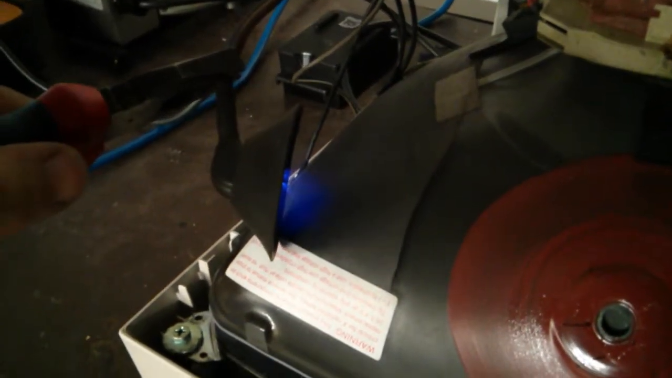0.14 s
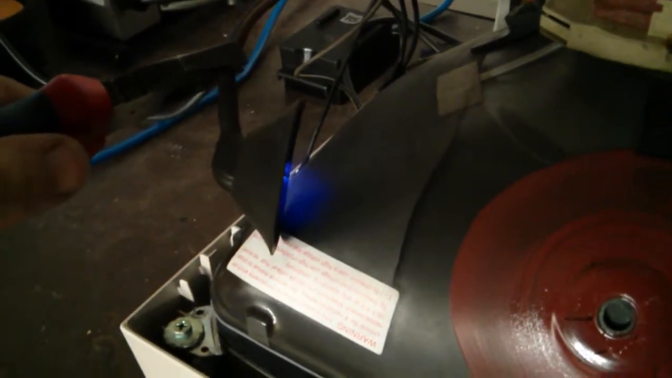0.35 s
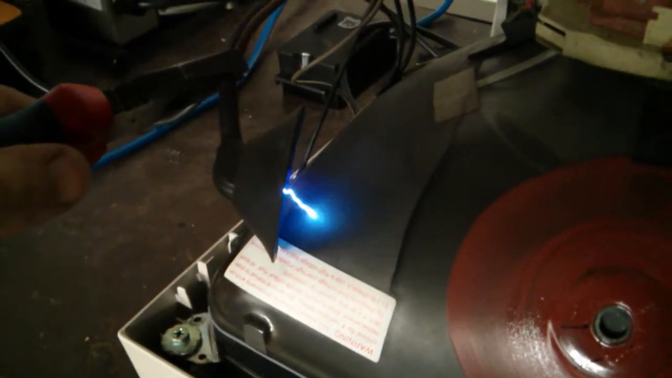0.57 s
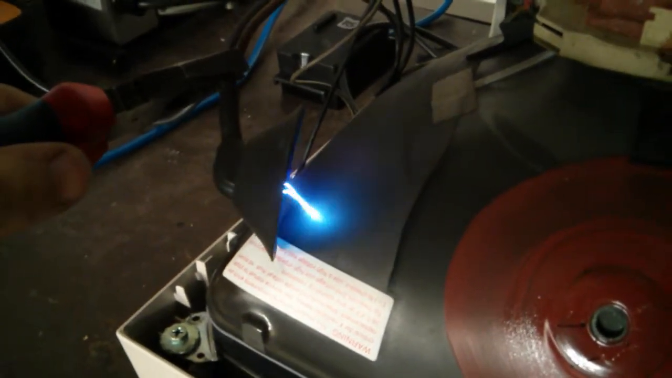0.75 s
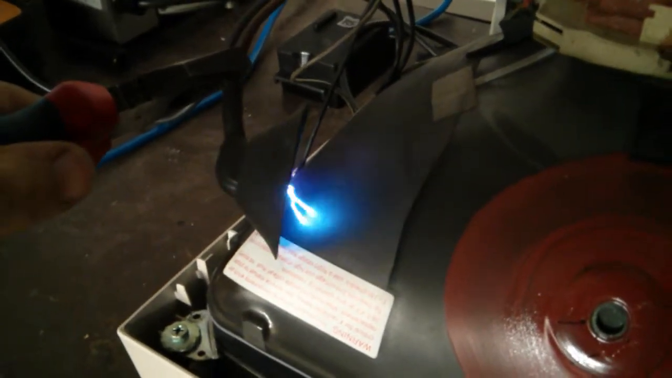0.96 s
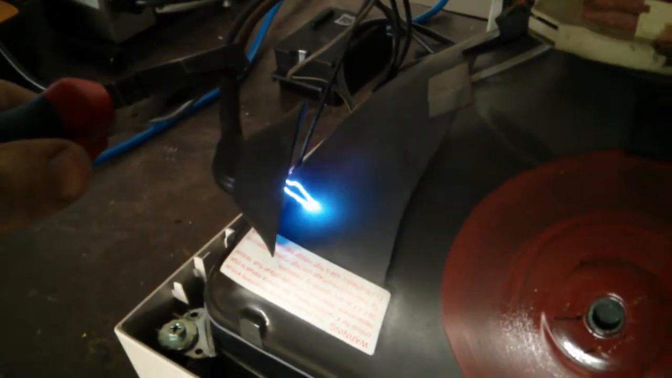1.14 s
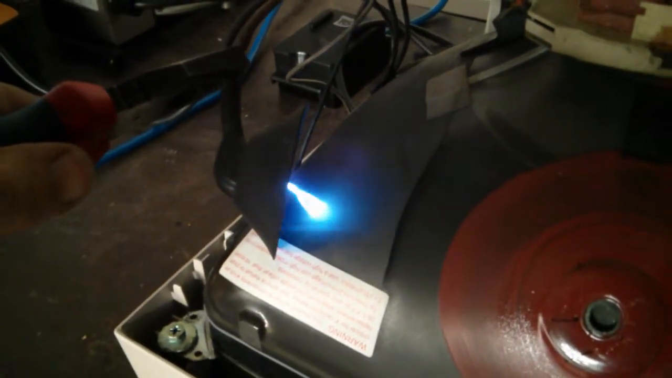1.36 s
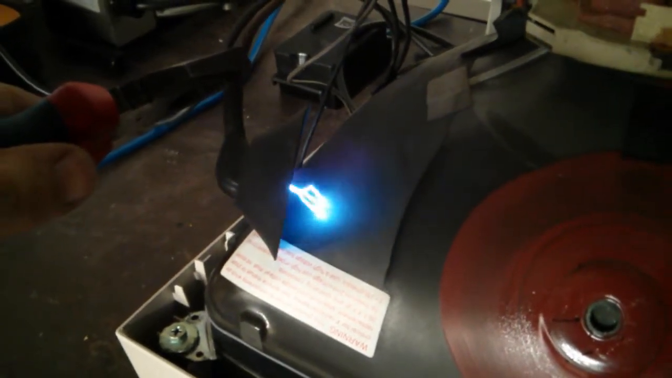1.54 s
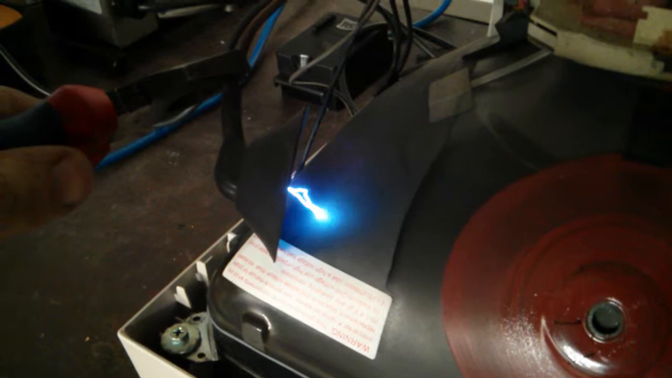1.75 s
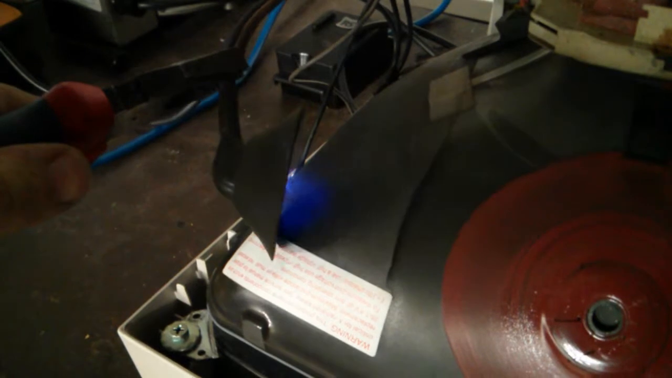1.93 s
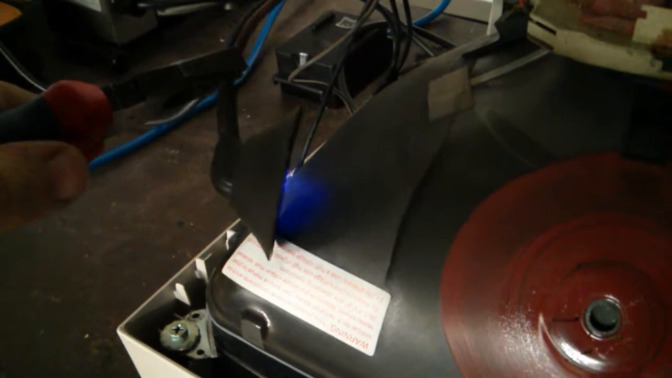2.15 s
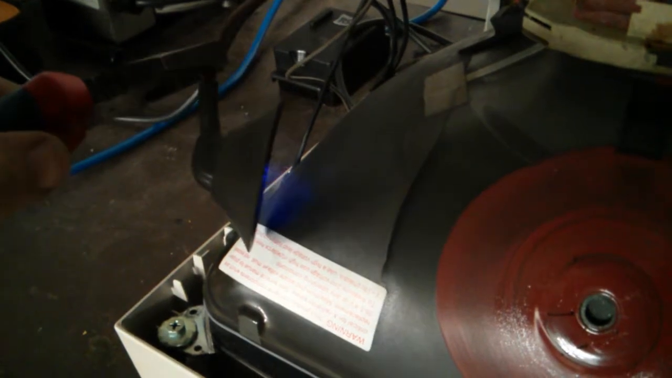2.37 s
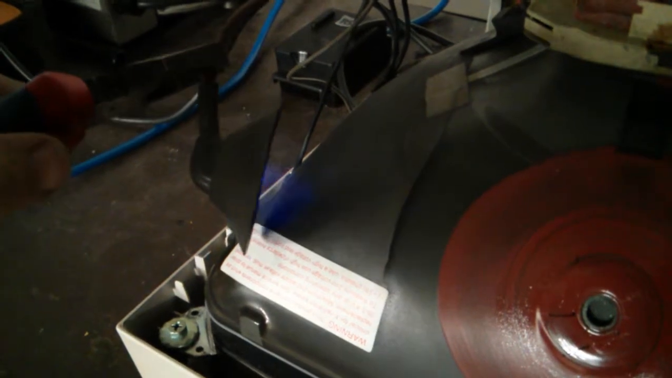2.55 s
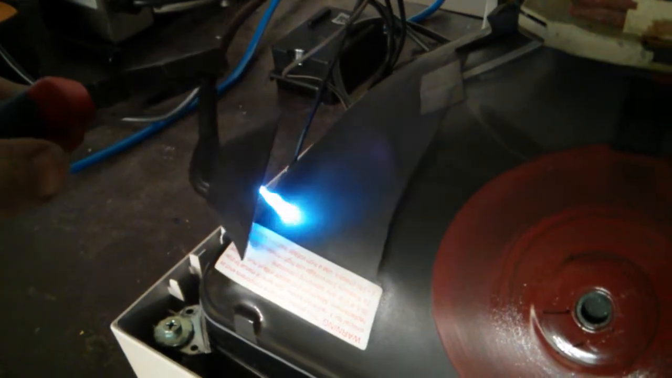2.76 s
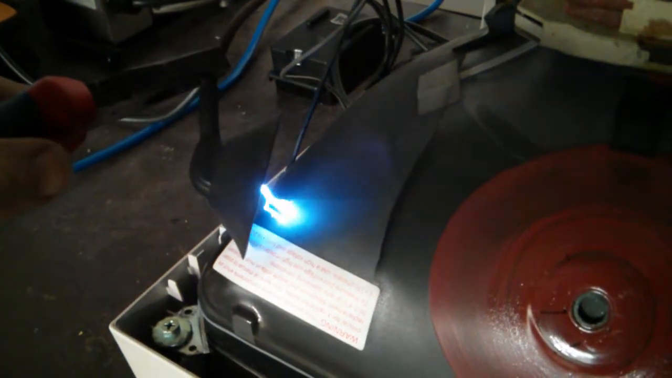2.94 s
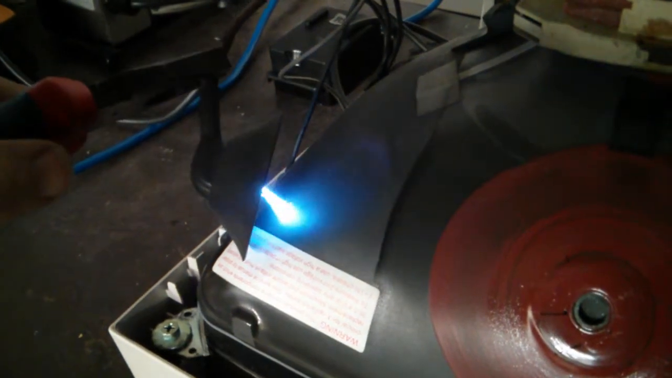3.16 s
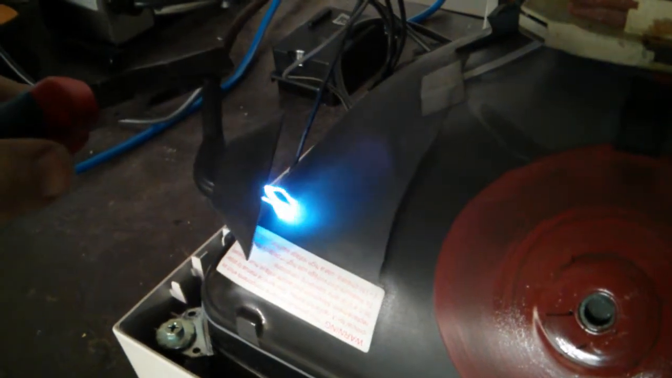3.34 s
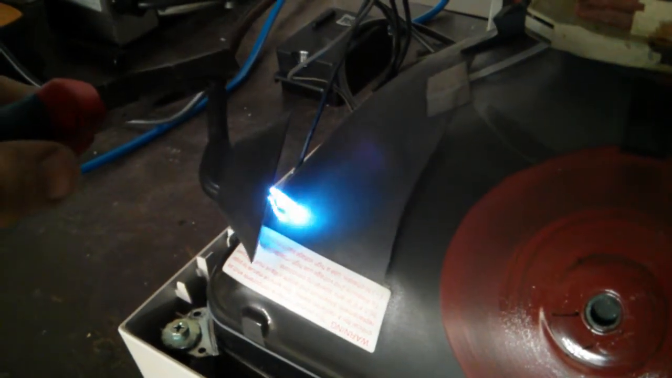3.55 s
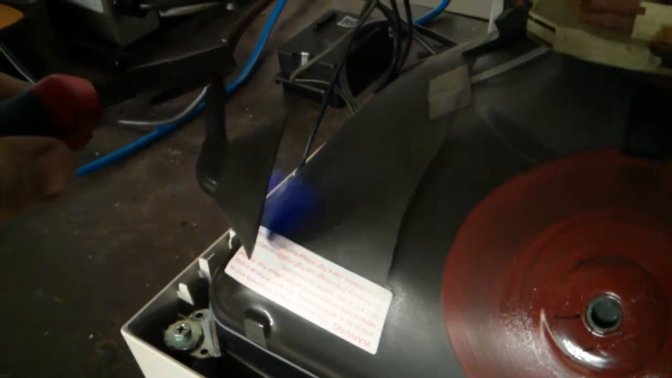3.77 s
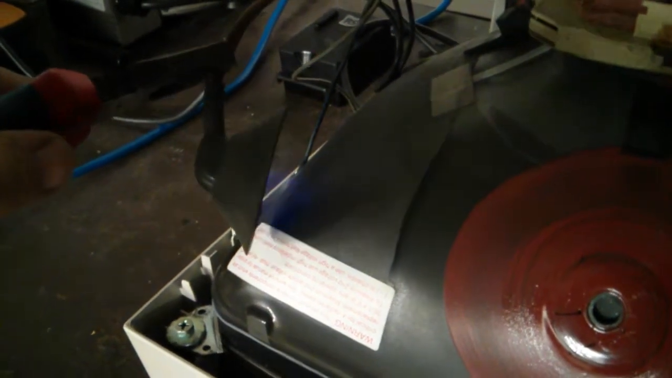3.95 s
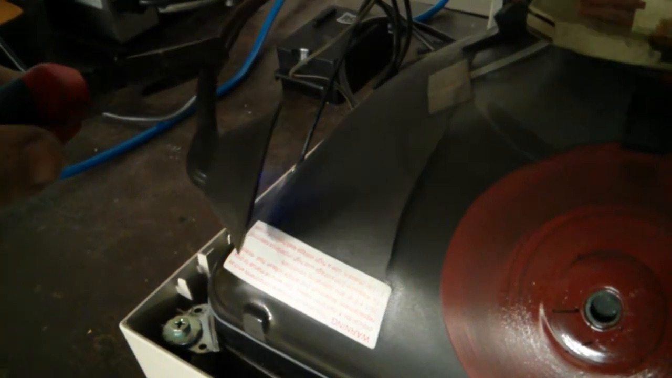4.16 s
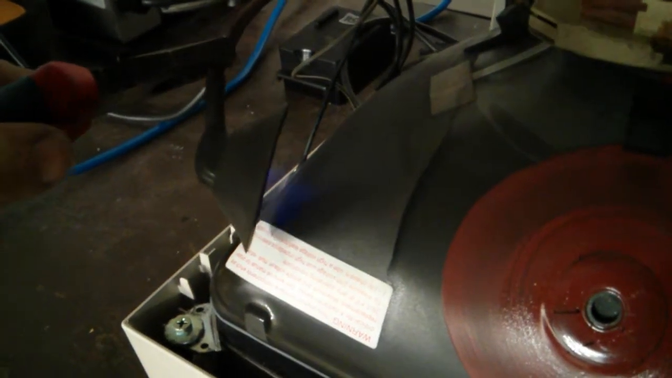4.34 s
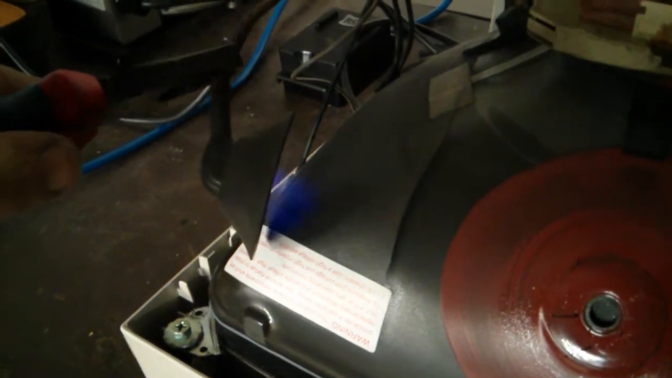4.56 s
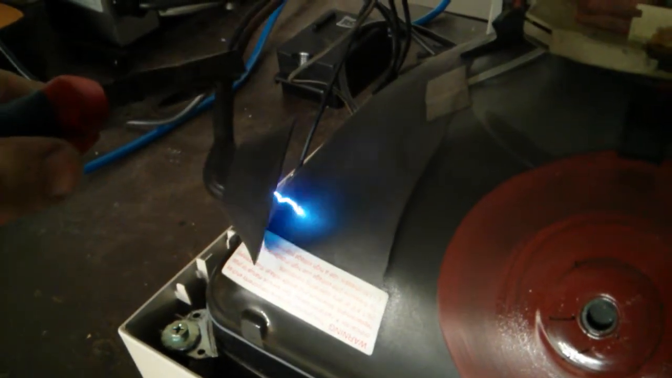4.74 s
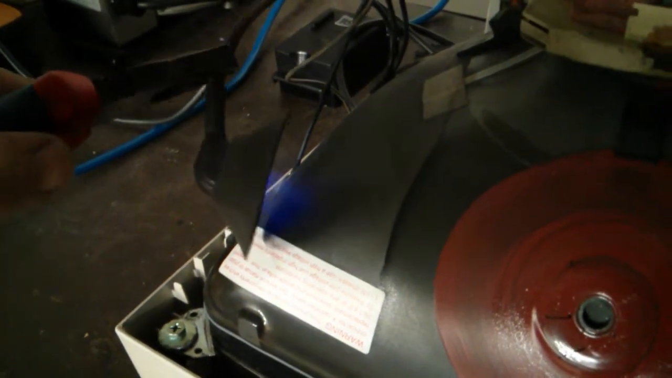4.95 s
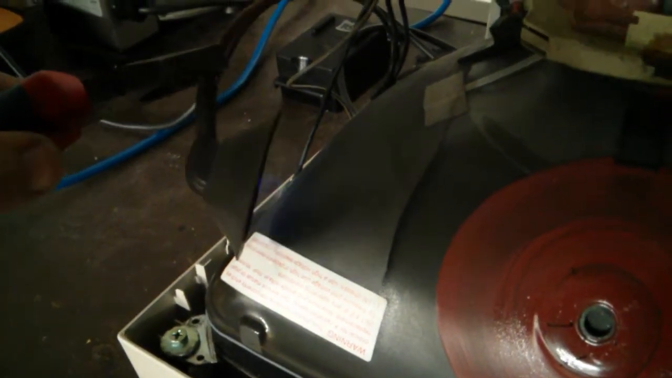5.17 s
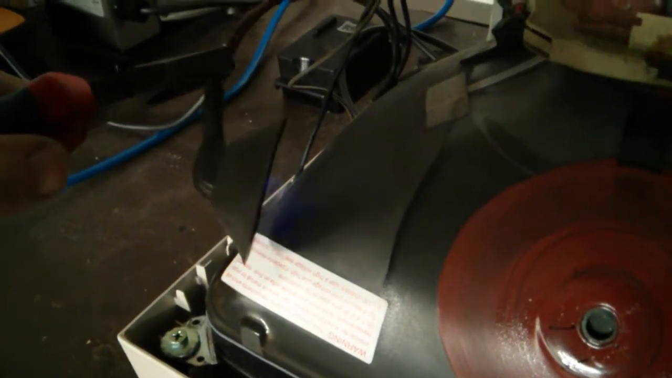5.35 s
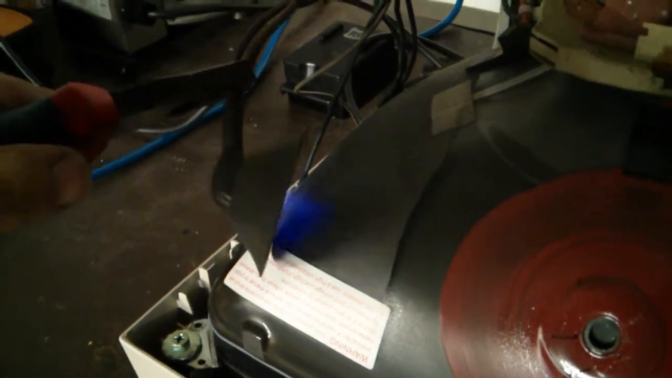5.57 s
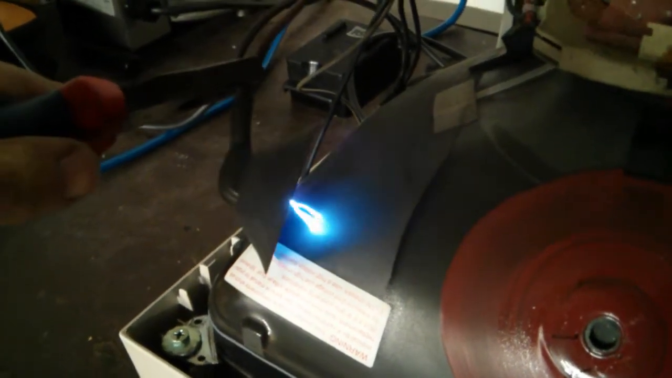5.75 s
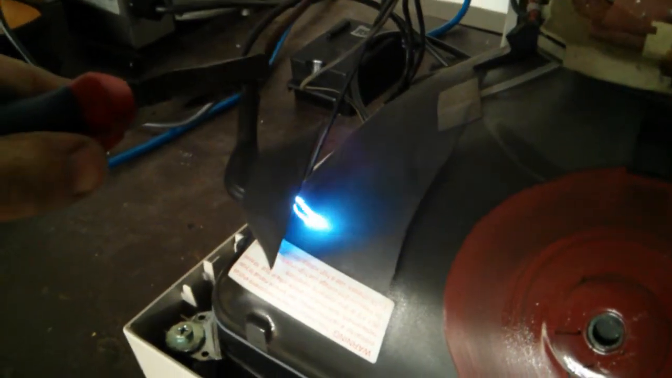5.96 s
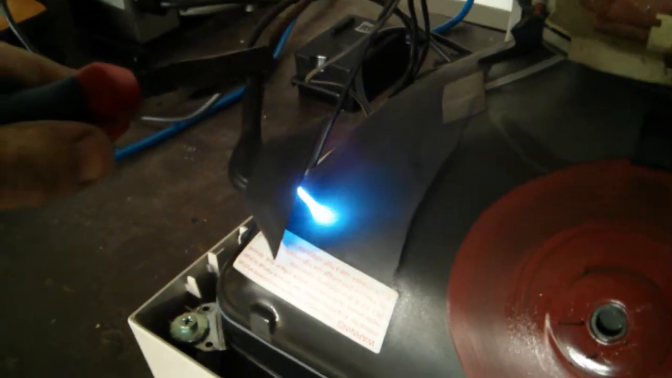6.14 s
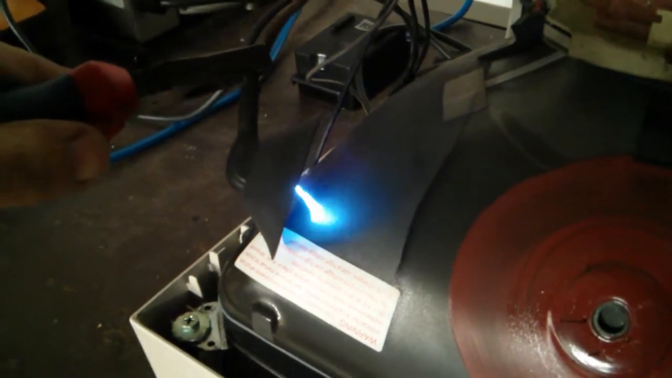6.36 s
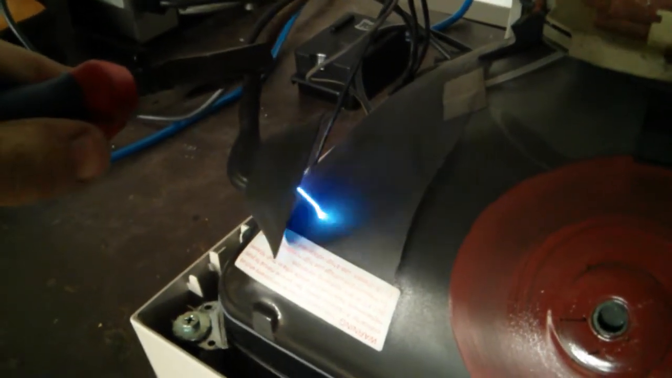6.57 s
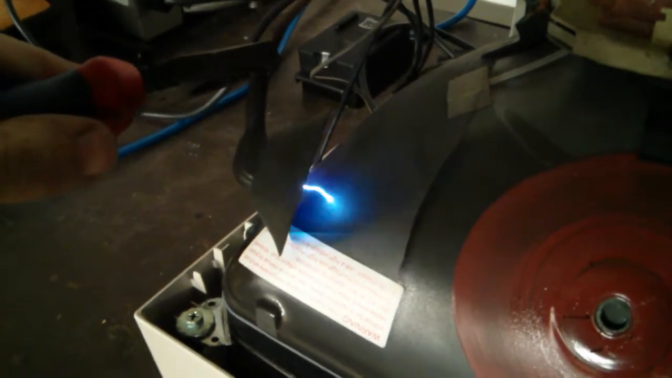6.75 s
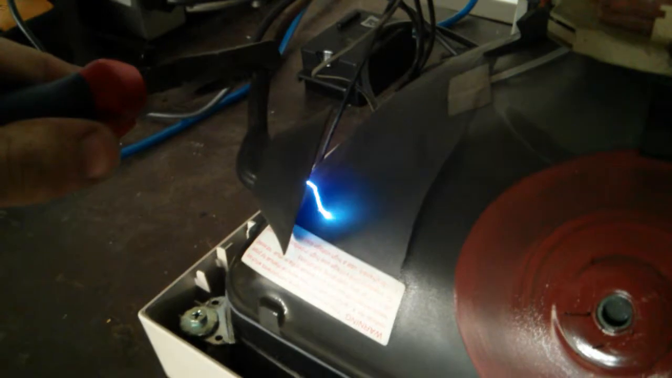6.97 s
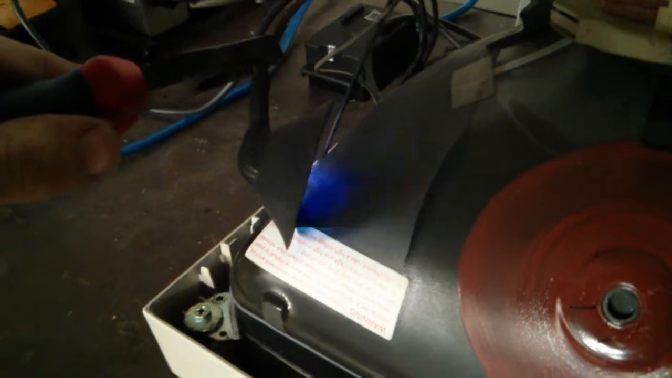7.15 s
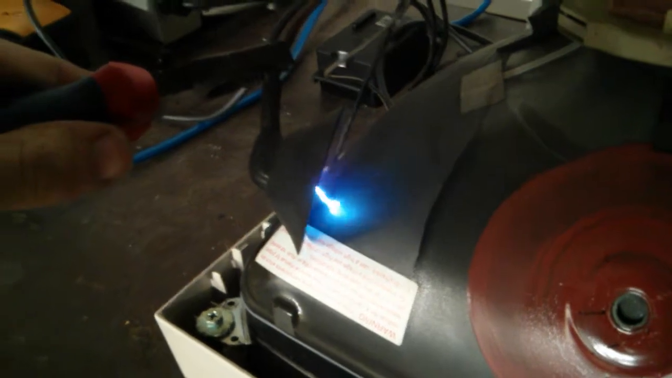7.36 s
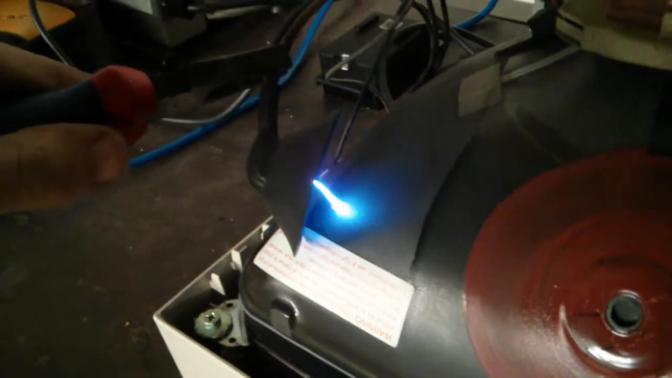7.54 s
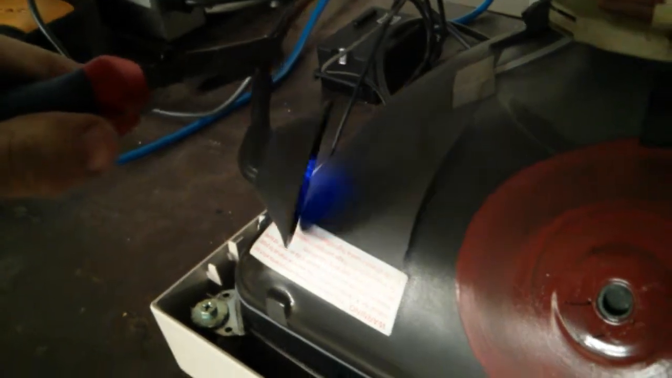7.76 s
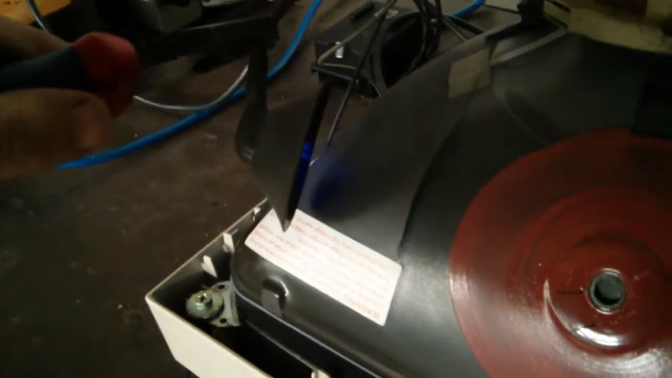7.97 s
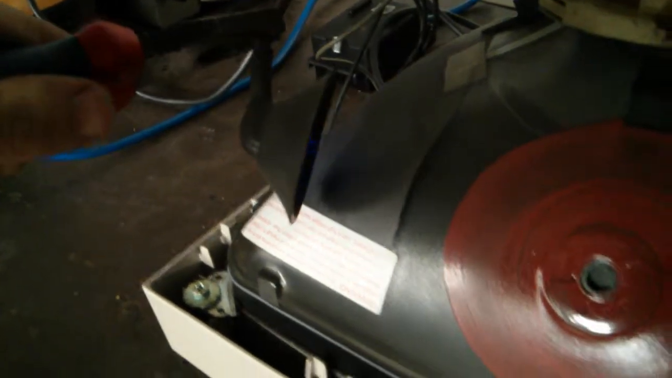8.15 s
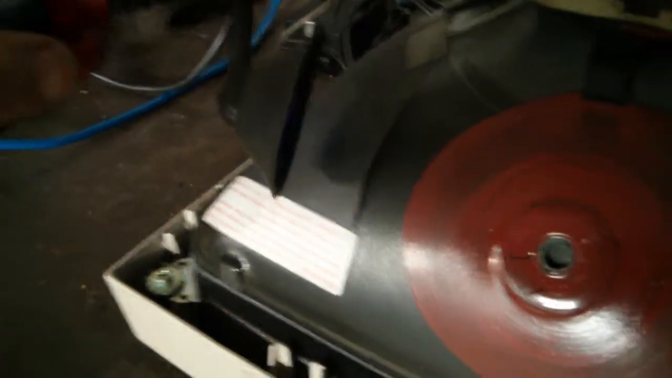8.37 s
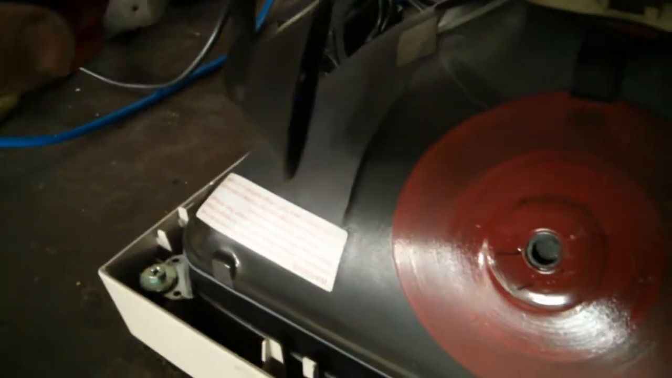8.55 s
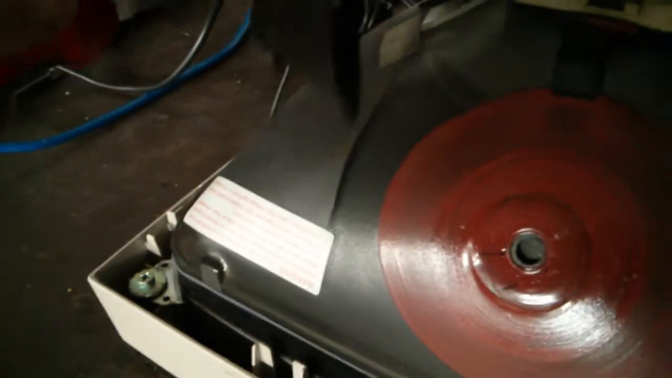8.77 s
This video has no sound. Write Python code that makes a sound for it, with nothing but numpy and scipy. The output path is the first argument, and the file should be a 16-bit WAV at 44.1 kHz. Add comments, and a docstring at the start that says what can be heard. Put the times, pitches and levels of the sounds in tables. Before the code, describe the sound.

Indoors, a ragged electrical sizzle gives way to a loud hissing arc jumping from an electrode to a picture tube. The arc cuts out and restarts several times, sputtering and thumping in the nearby mono microphone. In the pauses a softer, airy corona whistle slides down and back up in pitch. At the end the electrode is withdrawn, leaving a thin, high fizz that dies away.

```python
"""A hand-held high-voltage electrode near the glass of a picture tube, indoors, by a mono microphone.
First a ragged corona rasps at the tip. From 0.6 s an arc strikes on and off: a loud rushing hiss, with
thumps and dropouts as its field overloads the microphone. Near 2.5 s and from 3.8 to 5.7 s the tip is
drawn back and brought in: the corona's tiny pulses whistle, lower as the gap widens, higher as it closes.
At 7.8 s the tip leaves for good; the corona and a thin leakage fizz run down and stop near 8.7 s."""
import sys
import numpy as np
from scipy import signal
from scipy.fft import rfft, irfft, next_fast_len
from scipy.io import wavfile
from scipy.ndimage import uniform_filter1d, map_coordinates

SR = 44100
rng = np.random.default_rng(int(sys.argv[2]) if len(sys.argv) > 2 else 0)


def file_out(sig):
    """Save sig as 16-bit WAV at sys.argv[1]."""
    # one column per channel
    cols = np.atleast_2d(sig).T
    # limit, then scale
    lim = np.clip(cols, -1, 1)
    pcm = np.round(lim * 32767).astype(np.int16)
    wavfile.write(sys.argv[1], SR, pcm)


N = 388521


def arc(level_db, sparks_per_s=14000, flutter_db=3.0):
    """The burning channel: a dense, irregular crowd of sparks, flickering as it writhes."""
    # arc spectrum: freq_hz, level_db
    arc_spectrum = [(30, -0.5), (150, -3.5), (500, -5), (1200, -5.5), (2200, -9.5), (3500, -16.5),
                    (4500, -11), (5600, -5), (6900, -4.5), (8000, -0.5), (9000, 0.5), (10500, -2.5),
                    (12500, -3.5), (15700, -9)]
    sparks = (rng.random(N) < sparks_per_s / SR) * rng.standard_normal(N)
    return amp(level_db + flutter_db * wobble(110)) * coloured(sparks, arc_spectrum)


def burning(strike_s=.01, quench_db_per_s=376.5):
    """Arc envelope in dB: each burn lights at once, holds and is quenched."""
    # arc burns: strike_s, out_s, level_db
    burns = [(.63, 0.683, -15), (0.721, 0.736, -18), (0.848, 0.881, -12.5), (0.912, 0.969, -15.5),
             (1.052, 1.96, -9), (2.695, 3.796, -4.5), (4.72, 4.797, -10.5), (4.819, 4.837, -13),
             (5.735, 6.57, -7.5), (6.59, 6.729, -9.5), (6.829, 6.91, -10), (6.996, 7.18, -10.5),
             (7.31, 7.815, -10.5)]
    t = seconds()
    gain = 0
    for start_s, out_s, level_db in burns:
        lit = np.clip((t - start_s) / strike_s + .5, 0, 1)
        gain = gain + lit * amp(level_db - quench_db_per_s * np.maximum(t - out_s, 0))
    return 20 * np.log10(gain + 1e-6)


def jumps(arc_db, spacing_s=.0112, hops_per_s=7, hop_above_db=-11, hop_db=-6.0, hop_drop_db=8.0):
    """The arc jumps to new roots in fits, and hops at random while strong: (time_s, thump_db, drop_db)."""
    # fits of sputtering: start_s, jump_count, thump_db, dropout_db
    fits = [(.636, 1, -8, 6), (.677, 1, -10.5, 9), (.845, 1, -9, 1), (.923, 1, -2.5, 2.5),
            (1.2, 2, -11.5, 2.5), (1.392, 2, -6.5, 10.5), (1.642, 1, -5, 11), (1.779, 1, -11.5, 16.5),
            (1.876, 1, -9, 12), (2.76, 1, -2.5, 26), (2.911, 3, -5.5, 9.5), (2.988, 1, -1, 10),
            (3.027, 3, -3, 10), (3.259, 1, -1, 15), (3.641, 1, -5.5, 14.5), (4.86, 1, -2.5, 18),
            (5.785, 2, -6, 19.5), (6.025, 2, 2, 13.5), (6.141, 2, -4.5, 32.5), (6.163, 1, 6, 1.5),
            (6.191, 2, -0.5, 15.5), (6.335, 1, 1.5, 33.5), (6.372, 2, 0, 22), (6.461, 2, -3, 29.5),
            (6.497, 1, 0.5, 13), (6.529, 2, -5, 13), (7.092, 2, -9, 33)]
    leaps = [(start_s + k * spacing_s, thump_db, drop_db)
             for start_s, count, thump_db, drop_db in fits for k in range(round(count))]
    hopping = (rng.random(N) < hops_per_s / SR) & (arc_db > hop_above_db)
    size_db = 2.5 * rng.standard_normal(N)
    hops = [(i / SR, hop_db + size_db[i], hop_drop_db * amp(size_db[i])) for i in np.flatnonzero(hopping)]
    return np.transpose(leaps + hops)


def overload(arc_db, twitches_per_s=105, full_arc_db=-10.0, thump_s=.0008, low_cut_hz=48, drop_s=.0025):
    """At each jump or twitch the arc's field overloads the microphone: a low thump, a brief dropout."""
    time_s, thump_db, drop_db = jumps(arc_db)
    kicks = spikes(time_s - thump_s, amp(thump_db)) * rng.choice([-1, 1], N)
    # twitches grow with the power in the channel
    twitch_db = -13.5 + 1.9 * np.minimum(arc_db - full_arc_db, 0)
    sizes = 2 * rng.choice([-1, 1], N) * rng.random(N) * amp(twitch_db)
    twitches = (rng.random(N) < twitches_per_s / SR) * sizes
    thump_age = np.arange(SR // 100) / SR / thump_s
    thumps = signal.fftconvolve(kicks + twitches, thump_age * np.exp(1 - thump_age))[:N]
    # each thump swings back
    thumps = signal.sosfilt(signal.butter(2, low_cut_hz, "high", fs=SR, output="sos"), thumps)
    drop_age = np.arange(SR // 30) / SR / drop_s
    drop_shape = drop_age * np.exp((1 - drop_age) / 2 - drop_age ** 2 / 10)  # falls fast, recovers slower
    dropouts_db = spikes(time_s, np.abs(drop_db)) + np.roll(11 * np.abs(twitches), SR // 500)
    return thumps, amp(-signal.fftconvolve(dropouts_db, drop_shape)[:N])


def corona(level_db, rate_hz, scatter, whistle_db, jitter_s=.00002, flutter_db=.8):
    """Each pulse waits for the last one's ions to clear: a nearly regular train, a breathy whistle."""
    # corona spectrum: freq_hz, level_db
    corona_spectrum = [(60, -27), (450, -12), (650, -2.5), (880, -6.5), (1250, 3), (1750, 6), (3000, 1.5),
                       (3800, -1), (5200, 4.5), (6300, 5), (8700, 8), (10700, 8.5), (12000, -1.5),
                       (14200, -3), (15600, 5)]
    rate_hz = rate_hz * np.exp(.02 * wobble(90))
    cycles = np.cumsum(rate_hz) / SR
    wait_draw, size_draw, jitter_draw = rng.standard_normal((int(cycles[-1]), 3)).T
    spread = np.interp(np.arange(len(wait_draw)), cycles, scatter)
    waits = np.exp(spread * wait_draw - spread ** 2 / 2)
    times_s = np.interp(np.cumsum(waits), cycles, seconds(), right=2 * N / SR)
    times_s += jitter_s * jitter_draw  # blurs the overtones
    train = spikes(times_s, np.exp(.045 * size_draw)) - rate_hz / SR
    train = filtered(train, lambda hz: np.exp(-1j * np.pi * hz ** 2 / 12e6))  # smears pulses over ~1 ms
    hiss = coloured(train / np.sqrt(rate_hz), corona_spectrum)
    hiss += ion_clouds(cycles, rate_hz, scatter, whistle_db)
    # stronger pulses last longer and so carry less treble
    treble = filtered(hiss, lambda hz: hz ** 4 / (hz ** 4 + 7500 ** 4))
    treble_db = -.042 * (np.maximum(level_db, -30) + 21)
    hiss += treble * (amp(treble_db) - 1)
    return amp(level_db + flutter_db * wobble(70)) * hiss


def ion_clouds(cycles, rate_hz, scatter, whistle_db, ring_hz=5300, ring_width_hz=1000, ring_pull=.42):
    """Drifting ion clouds swell and shrink raggedly near the pulse rate and its octave."""
    def ragged(turns, knots_per_s):
        envelope = wobble(knots_per_s) + 1j * wobble(knots_per_s)
        return unit(np.real(envelope * np.exp(2j * np.pi * turns)))

    regularity = np.minimum(.11 / np.abs(scatter), 1) ** 1.5
    flicker = amp(3 * wobble(45))
    squeal = amp(whistle_db - 14) * ragged(.97 * cycles, 480)
    # the octave stands out only near a resonance, which draws it towards itself
    octave_cycles = 2 * cycles + ring_pull * (ring_hz * seconds() - 2 * cycles)
    octave_gain = amp(-9) / (1 + (2 * (2 * rate_hz - ring_hz) / ring_width_hz) ** 2) ** .4
    return regularity * flicker * (squeal + octave_gain * ragged(octave_cycles, 880))


def hand_pulls():
    """The hand eases the tip out and back, staying away the last time: (widening, whistle_db)."""
    # pulls: leave_s, farthest_s, back_s, widening_in_working_gaps, ease_exponent, extra_whistle_db
    pulls = [(2.1, 2.56, 2.92, 0.5, 1.88, 0), (3.62, 4.202, 4.81, .92, 1.6, 5),
             (4.9, 5.325, 5.68, 1.125, 1.25, -8), (7.789, 8.389, 19.7, 1.25, 1.3, -1.5)]
    widening, whistle_db = 0, 0
    for leave_s, farthest_s, back_s, width, ease, extra_db in pulls:
        away = np.sin(np.pi / 2 * np.interp(seconds(), [leave_s, farthest_s, back_s], [0, 1, 0]))
        widening = widening + width * away ** ease
        whistle_db = whistle_db + extra_db * np.sqrt(away)
    return widening, whistle_db


def gap_response(widening):
    """A wider gap slows and weakens the corona: (rate_hz, level_db, scatter, stray_db)."""
    # corona by gap: widening_in_working_gaps, rate_hz, level_db, interval_scatter, stray_sparks_db
    corona_by_gap = [(0, 3009, -10, .115, -23), (.1, 2784, -10, .07, -31), (.27, 2381, -12, .06, -32),
                     (.43, 2101, -13, .08, -41), (.66, 1980, -18.5, .125, -62),
                     (.87, 1763, -26, .23, -62.5), (1.25, 1301, -40.5, .28, -64)]
    widths, *columns = np.transpose(corona_by_gap)
    return [np.interp(widening, widths, column) for column in columns]


def rasp(sparks_per_s=6000, level_db=-15):
    """Uneven small sparks roughen the corona before the first arc."""
    # rasp spectrum: freq_hz, level_db
    rasp_spectrum = [(200, -42), (1600, -24.5), (2100, -5.5), (2750, -2), (3300, -7.5), (3800, -2),
                     (4500, -9.5), (5400, 0.5), (7500, -3.5), (15000, -24)]
    sparks = (rng.random(N) < sparks_per_s / SR) * rng.choice([-1, 1], N)
    return amp(level_db) * coloured(sparks, rasp_spectrum)


def leak(start_s=7.85, rise_s=.2, level_db=-27, flutter_db=3.0):
    """Leakage lingers as a thin fizz at the withdrawn tip."""
    # leakage spectrum: freq_hz, level_db
    leak_spectrum = [(500, -40), (1100, -2.5), (3000, -11.5), (4500, -13.5), (6800, 5), (8000, -2),
                     (9800, -19), (12500, -11), (15300, 4)]
    rise = np.clip((seconds() - start_s) / rise_s, 0, 1)
    gain = rise * amp(level_db + run_down() + flutter_db * wobble(90))
    return gain * coloured(rng.standard_normal(N), leak_spectrum)


def run_down(slide_s=8.27, slide_db_per_s=57.5, stop_s=8.69, stop_db_per_s=450):
    """The discharge's final fade in dB: a steady slide, then a quick stop."""
    t = seconds()
    return -slide_db_per_s * np.maximum(t - slide_s, 0) - stop_db_per_s * np.maximum(t - stop_s, 0)


def surroundings(x, notch_share, room_db, echo_s=.002985):
    """Close surfaces comb the hiss and cancel narrow bands; the room adds a short tail."""
    # close echo: freq_hz, reflected_share
    echo_shares = [(1500, .04), (2100, .25), (2500, .6), (3550, .68), (3850, .55), (4200, .3), (5200, .1),
                   (15000, .07)]
    # bands cancelled by reflections from glass and bench: centre_hz, width_hz, depth_db
    notches = [(2494, 145, 9), (5910, 140, 7), (6940, 550, 6), (7960, 120, 11.5), (9250, 120, 11),
               (10060, 110, 9)]
    # room decay: freq_hz, t60_s
    room_decay = [(200, 0.078), (3000, 0.46), (15000, 0.45)]

    def reflections(hz):
        comb = 1 + np.clip(along(echo_shares, hz), 0, 1) * np.exp(-2j * np.pi * hz * echo_s)
        notch_db = sum(depth * np.exp(-((hz - centre) / width) ** 2) for centre, width, depth in notches)
        return comb * amp(-notch_share * notch_db)

    band_hz, t, noise = signal.stft(rng.standard_normal(SR // 3), SR, nperseg=256)
    decay = amp(-60 * t / along(room_decay, band_hz)[:, None])
    tail = signal.istft(noise * decay, SR, nperseg=256)[1]
    wet = signal.fftconvolve(x, tail / np.linalg.norm(tail))[:N]
    return filtered(x + amp(room_db) * wet, reflections)


def room_tone(level_db=-81):
    """Faint, low background noise."""
    # room noise spectrum: freq_hz, level_db
    room_spectrum = [(25, 0), (150, -18), (700, -13), (2000, -38), (15000, -41)]
    return amp(level_db) * coloured(rng.standard_normal(N), room_spectrum)


def seconds():
    """Time of each sample."""
    return np.arange(N) / SR


def amp(db):
    """Decibels to gain."""
    return 10 ** (np.asarray(db) / 20)


def unit(x):
    """Scale to rms 1."""
    return x / np.sqrt(np.mean(x ** 2) + 1e-20)


def along(points, hz):
    """Interpolate (freq_hz, value) points on a log axis."""
    freq_hz, values = np.transpose(points)
    return np.interp(np.log(hz + 1), np.log(freq_hz + 1), values)


def wobble(knots_per_s):
    """A smooth random curve."""
    knots = rng.standard_normal(int(N * knots_per_s / SR) + 4)
    return map_coordinates(knots, [np.arange(N) * knots_per_s / SR])


def filtered(x, response):
    """x through a complex frequency response."""
    size = next_fast_len(N + SR // 2)
    return irfft(rfft(x, size) * response(np.fft.rfftfreq(size, 1 / SR)), size)[:N]


def coloured(x, spectrum):
    """x through a spectrum, at rms 1."""
    return unit(filtered(x, lambda hz: amp(along(spectrum, hz))))


def spikes(times_s, sizes):
    """Single-sample pulses."""
    return np.bincount(np.clip(np.round(times_s * SR).astype(int), 0, N), sizes, N + 1)[:N]


def scene(cold_until_s=.6, cold_fade_s=.1, cold_hz=3394, cold_scatter=.22, starve_above_db=-13.5):
    """Arc and corona share one current in the room; both channels are the same."""
    widening, whistle_db = hand_pulls()
    rate_hz, corona_db, scatter, stray_db = gap_response(widening)
    # cold: before the first arc the corona is faster, weaker and ragged
    cold = np.clip((cold_until_s - seconds()) / cold_fade_s + 1, 0, 1)
    rate_hz = (rate_hz + cold * (cold_hz - rate_hz)) * np.exp(.015 * wobble(12))  # tremor
    scatter = scatter + cold * (cold_scatter - scatter)
    burn_db = burning() + 1.47 * wobble(6.3)  # the channel writhes
    # a strong arc robs the corona of current
    starved_db = .89 * 20 * np.log10(1 + amp(burn_db - starve_above_db))
    corona_db = corona_db - 3.5 * cold + run_down() - starved_db
    # at about equal strength the two take turns in short bursts
    contest = 1 / np.cosh((burn_db - corona_db) / 10)
    turn = .92 * contest * np.tanh(3 * wobble(50))
    arc_db = np.maximum(burn_db + 10 * np.log10(1 + turn), stray_db + run_down())
    corona_db += 10 * np.log10(1 - turn)
    at_tip = corona(corona_db, rate_hz, scatter, whistle_db) + cold * rasp() + leak()
    hiss = surroundings(arc(arc_db + 2.5), notch_share=.031, room_db=-12)
    hiss += surroundings(at_tip, notch_share=.96, room_db=-7.5)
    thumps, hiss_gain = overload(arc_db)
    mono = hiss * hiss_gain + thumps + room_tone()
    return np.array([mono, mono])


def record(dry, limit_db=-6.0, ceiling=.74, hardness=4, top_hz=15800):
    """Fast limiter, soft clipper, then a sharp band limit."""
    power = np.abs(uniform_filter1d(dry ** 2, size=220, axis=1))
    held = dry / (1 + (power / amp(limit_db) ** 2) ** 3) ** (1 / 6)
    rounded = held / (1 + np.abs(held / ceiling) ** hardness) ** (1 / hardness)
    return np.array([filtered(side, lambda hz: hz < top_hz) for side in rounded])


dry = scene()
out = record(dry)
file_out(out)
```